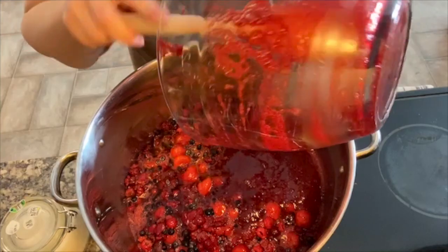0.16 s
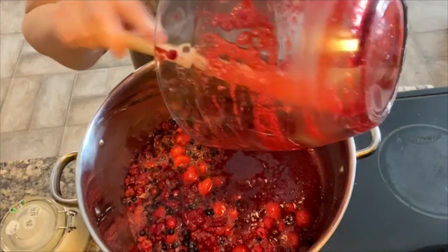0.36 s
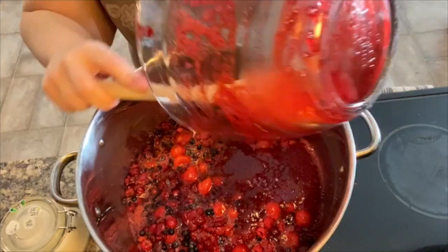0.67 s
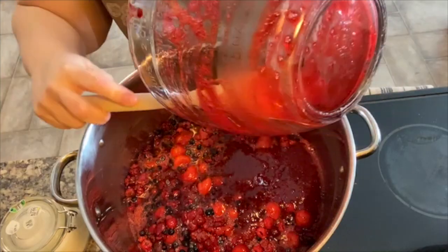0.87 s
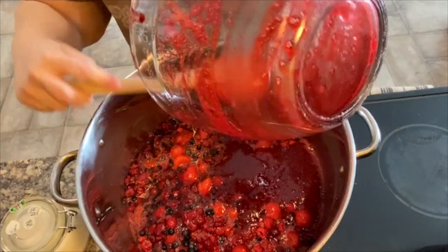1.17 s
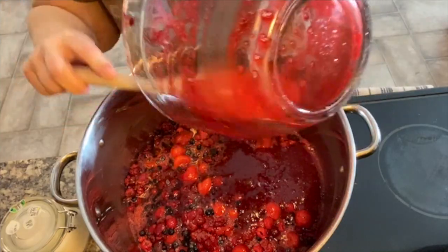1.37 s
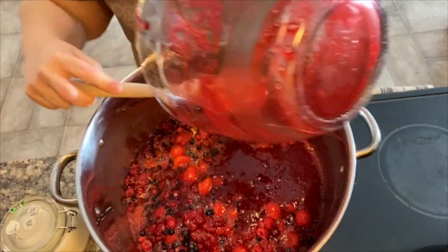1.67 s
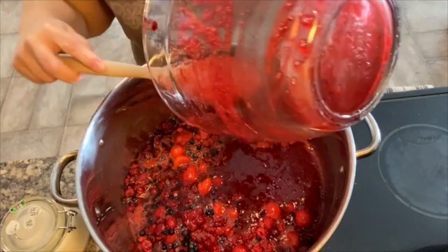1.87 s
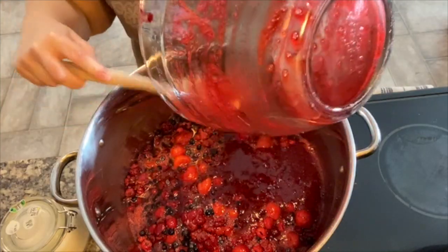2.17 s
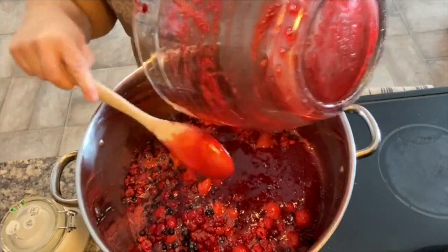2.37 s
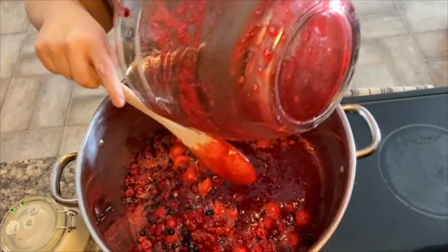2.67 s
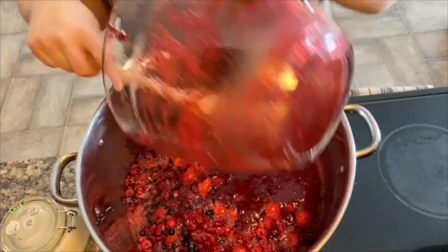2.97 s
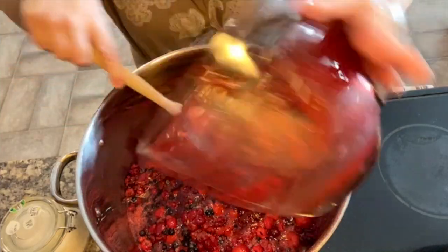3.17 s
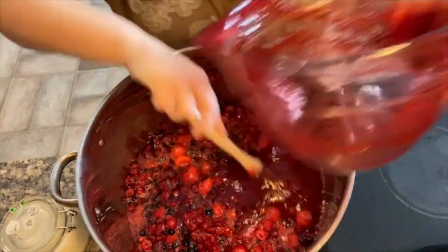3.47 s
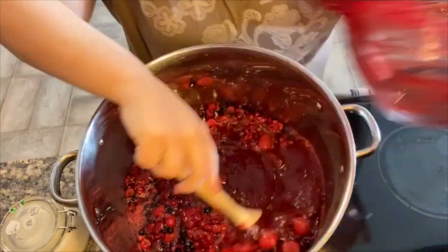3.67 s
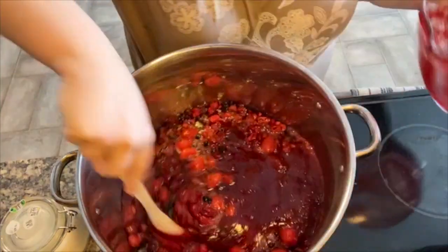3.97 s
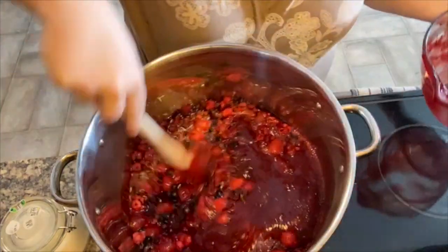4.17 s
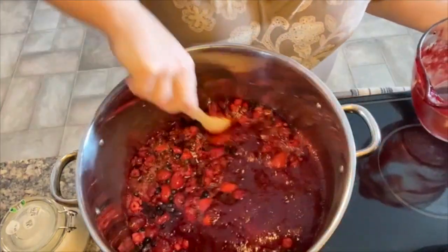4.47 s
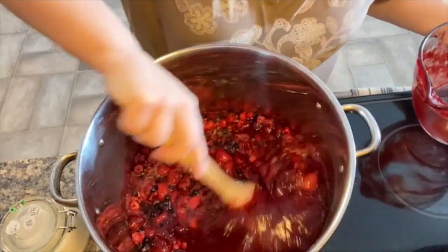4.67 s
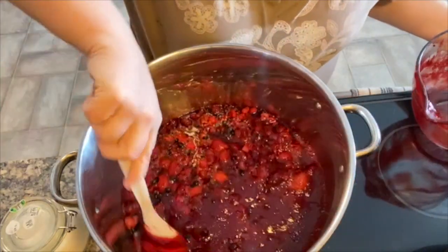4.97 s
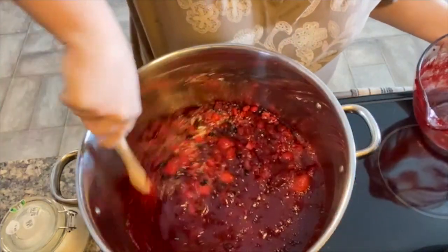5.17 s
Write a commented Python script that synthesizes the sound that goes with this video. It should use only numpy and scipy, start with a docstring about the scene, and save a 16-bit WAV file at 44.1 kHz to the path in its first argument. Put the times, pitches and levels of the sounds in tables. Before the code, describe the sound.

A stereo microphone sits close to a steel pot in a home kitchen, with a quiet, low appliance hum and room noise throughout. For the first three seconds a wooden spoon scrapes fruit pulp from a glass bowl, with short drags, soft squelches and wet clicks. It knocks and bounces on the glass at about 0.2 and 0.4 seconds, also bumping the pot, then hardest at 1.4 seconds, leaving a brief ringing murmur. A double knock with bright, juicy snaps comes at 2 seconds, and lighter taps follow near 2.5 and 2.7. From 3.2 to 4.3 seconds the spoon slides into the pot and round it with two soft swishes, the first sinking in pitch. Stirring continues to the end, the fruit squelching, clicking and faintly crackling, while the spoon bumps the full pot with dull thuds at about 3.4, 4.5, 4.9 and 5.2 seconds.

```python
"""A home kitchen, stereo microphone close to a steel pot; fruit pulp is scraped into it from a glass bowl.
From the start an appliance hums and the room's noise resonates in the open pot. For the first three
seconds a wooden spoon drags, knocks and bounces on the bowl and twice bumps the pot; the bowl murmurs on
after two of the knocks, and wet pulp clicks and squelches. Next the spoon swishes into the pot and round
it. To the end it stirs the faintly crackling fruit and bumps the full pot with dull thuds."""
import sys
import numpy as np
from scipy import signal
from scipy.fft import rfft, irfft, next_fast_len
from scipy.io import wavfile

SR = 44100
rng = np.random.default_rng(int(sys.argv[2]) if len(sys.argv) > 2 else 0)


def bounce(signal):
    """Save signal as a 16-bit WAV file at the path given by the first command-line argument."""
    frames = np.transpose(np.atleast_2d(signal))
    limited = np.clip(frames, -1, 1)
    pcm = np.round(limited * 32767).astype(np.int16)
    wavfile.write(sys.argv[1], SR, pcm)


N = 235048
TIME = np.arange(N) / SR
BLOW_TIME = TIME[:SR // 2]

# how alike left and right are at the microphone: frequency_hz, correlation
STEREO_LIKENESS = [(30, 0.75), (150, 0.99), (300, 0.457), (600, 0.17), (1500, 0.319), (5000, 0.13),
                   (9000, 0.97), (14000, 0.6)]
# the appliance's motor: pitch_hz, level_db
HUM_PARTIALS = [(60.5, -72.5), (118.7, -51.5)]
# room tone: frequency_hz, density_db
ROOM_SPECTRUM = [(20, -21.5), (30, -17), (42, -7.5), (62, -0.5), (90, 2.5), (160, -7), (260, -8),
                 (370, -17), (800, -19.5), (1500, -23.5), (2600, -26.5), (4000, -38.5), (6500, -44.5),
                 (13500, -45.5)]
# resonances of the air in the open pot: pitch_hz, width_hz, level_db
POT_AIR_MODES = [(532, 18, -63.5), (624.5, 4, -60.5), (1292, 24, -73)]
# close reflections off pot and hob: frequency_hz, density_db
NEAR_SPECTRUM = [(60, -13), (300, 1), (1500, -4), (5000, -5), (14000, -12)]
# the kitchen's reverberation: frequency_hz, t60_s
ROOM_DECAY = [(100, 0.5), (500, .4), (1500, 0.3), (4000, 0.47), (8000, 0.2), (15000, 0.48)]

# the spoon drags on the bowl, and the bowl murmurs on after two knocks: start_s, length_s, level_db
DRAGS_AND_MURMURS = [(-.02, 0.018, -49), (.565, 0.039, -52.5), (.69, .18, -64.5), (.98, 0.016, -60),
                     (1.42, 0.2, -55.5), (1.63, 0.057, -60.5)]
# the narrow murmur of spoon and bowl: frequency_hz, density_db
MURMUR_SPECTRUM = [(500, -24), (1000, -27), (1250, 5.5), (1340, 5), (1480, -3), (1900, -16), (2700, -20.5),
                   (4500, -32)]
# the spoon slides into the pot, then round it: start_s, peak_s, end_s, level_db
SLIDE_STROKES = [(3.249, 3.585, 3.762, -53.5), (3.74, 4.047, 4.3, -57.5)]
# resonances of the sliding spoon: pitch_ratio, level_db
SLIDE_RESONANCES = [(1.0, 6.5), (1.179, -10), (1.37, 1), (1.68, -6)]
# friction hiss of the slide: frequency_hz, density_db
SLIDE_SPECTRUM = [(900, -0.5), (1500, -8), (2100, 3.5), (3200, -11), (4200, -10), (5200, -14), (6300, -14),
                  (9000, -20.5), (14000, -25)]

# the spoon pushes pulp out of the bowl, then round the pot: start_s, length_s, level_db
PULP_STROKES = [(-.02, 0.047, -63.5), (.14, 0.16, -58.5), (.5, 0.11, -71), (.74, 0.1, -72.5),
                (.98, 0.075, -72), (2.19, .11, -68.5), (2.915, 0.072, -68), (3.26, 0.11, -65.5),
                (3.33, 0.275, -71), (3.86, 0.39, -64.5), (4.41, 0.12, -62), (4.72, 0.2, -66),
                (4.91, 0.47, -62)]
# squelching pulp: frequency_hz, density_db
SQUELCH_SPECTRUM = [(700, -2.5), (1500, 5.5), (2800, 1.5), (4000, -1), (6000, -4.5), (8500, -2.5),
                    (12500, -6.5), (15000, -7.5)]
# the loudest wet clicks: start_s, level_db, tilt_db_per_octave
WET_CLICKS = [(0.052, -42, 6), (0.1460, -36.5, -1), (0.647, -44, -2.5), (1.078, -36, -7), (1.236, -49, 6.5),
              (1.740, -45, -4), (1.919, -51.5, 7), (1.962, -33, 16), (1.981, -25, 20), (2.029, -24.5, 10),
              (2.607, -48, 3), (3.115, -50, 14), (3.295, -40, 2), (3.349, -39, 15), (3.674, -28.5, -5),
              (3.728, -34.5, 0), (4.597, -35.5, 19), (4.731, -38, 2.5), (4.955, -31, -0.5),
              (5.094, -31, 19), (5.1819, -32, 7)]
# one film of juice snapping: frequency_hz, density_db
SNAP_SPECTRUM = [(300, -9.5), (1200, -4), (4000, -1), (8500, 3), (14000, -11.5)]

# bumps on the full pot: start_s, ring_db, thump_db, tilt_db_per_octave
POT_BUMPS = [(0.2170, -42, -33, 0), (0.4389, -50, -32.5, -3), (3.398, -36, -25.5, -1.5),
             (3.6757, -67, -40, 7), (4.456, -31, -26, -0.5), (4.489, -60, -36.5, -3.5),
             (4.7300, -78, -43, 6.5), (4.7721, -61.5, -49.5, 3.5), (4.8995, -41.5, -36.5, -0.5),
             (5.217, -38, -28, 0)]
# the steel pot damped by fruit, before tuning: pitch_hz, level_db, t60_s
POT_MODES = [(57.3, -8.5, 0.65), (149, 4, 0.093), (188.8, 0, 0.2), (260.2, 1, 0.15), (318.6, -10.5, 0.098),
             (383.6, -10.5, 0.047), (427, -10.5, 0.32), (578, 3, 0.056), (656, -20.5, .12),
             (785.4, -0.5, 0.13), (1060, -10, 0.036), (1470, -11, 0.065)]
# the cushioned contact with the pot: frequency_hz, density_db
THUMP_SPECTRUM = [(50, -7.5), (150, -4), (400, 3.5), (750, -2), (1100, -8), (1600, -15.5), (3000, -23.5),
                  (6000, -48), (14000, -41.5)]

# spoon on bowl: start_s, spoon_db, glass_db, hollow_db, crack_db, crack_tilt_db_per_octave,
# rebound_gap_s, rebound_db
BOWL_KNOCKS = [(0.2160, -14.5, -37, -22.5, -13, 3.5, .0037, -10),
               (0.4372, -24, -47, -21.5, -17.5, -3, .0080, 5.5),
               (1.3585, -6.5, -23.5, -22, -13, -1.5, 0.019, -8.5),
               (1.6335, -45.5, -58.5, -63, -28.5, -5.5, .004, -22),
               (2.0060, -19.5, -30.5, -22.5, -21, -4.5, 0.0029, -31),
               (2.0266, -34, -23.5, -19, -37.5, -3.5, .0180, 13.5),
               (2.4635, -31, -34, -34, -29.5, -4.5, 0.0037, -8),
               (2.7040, -38.5, -55, -29, -27.5, -3.5, 0.0036, -13)]
# the damped wooden spoon, before tuning: pitch_hz, level_db, t60_s
SPOON_MODES = [(802.6, -37, 0.099), (1174, -14, 0.04), (1262, -10, 0.045), (1374.5, 0.5, 0.059),
               (1423, 6.5, 0.018), (1765, -8.5, 0.018), (1864, -13.5, 0.025), (2050, -12.5, 0.031),
               (2284, -18.5, 0.083), (2550, -24, 0.05), (2745, -17.5, .045), (3320, -28, .04),
               (5660, -35, 0.017), (6635, -36.5, 0.025)]
# the bowl's glass wall, before tuning: pitch_hz, level_db, t60_s
GLASS_MODES = [(1271, -13, .25), (1377, -17, .2), (1462, 0, .3), (1790, -17, .16), (1958, -18, .16),
               (2597, -19, .22), (2723, -23, .18), (3620, -27, .14), (4060, -26, .14)]
# the changing grip tunes the glass: time_s, pitch_ratio
GRIP_TUNING = [(.2, 1.02), (1.36, 1.0), (2.0, 1.03)]
# the hollow of air under the spoon, before tuning: pitch_hz, level_db, t60_s
HOLLOW_MODES = [(480, -13, .06), (596, -3, .07), (624, -1, .14)]
# the hard contact with the bowl: frequency_hz, density_db
CRACK_SPECTRUM = [(60, -20), (200, -9), (350, -23), (560, 4), (720, 0.5), (1050, 0), (1600, -11),
                  (2500, -2), (4000, -13), (8000, -19), (13000, -34.5)]


def from_db(db):
    """Decibels to gain."""
    return 10 ** (np.asarray(db) / 20)


def unit_rms(x):
    """Scale to unit power."""
    return x / np.sqrt(np.mean(x ** 2) + 1e-20)


def at_hz(points, hz):
    """Read a table along log frequency."""
    table_hz, values = np.transpose(points)
    return np.interp(np.log(hz + 1), np.log(table_hz), values)


def drift(rate_hz):
    """Smooth random wander of spread 1."""
    hz = np.fft.rfftfreq(N, 1 / SR)
    return unit_rms(irfft(rfft(rng.standard_normal(N)) / (1 + (hz / rate_hz) ** 4), N))


def coloured(white, spectrum, tilt=0):
    """Two unrelated signals become a stereo pair of rms 1, its spectrum tilted in dB per octave."""
    size = next_fast_len(white.shape[1])
    hz = np.fft.rfftfreq(size, 1 / SR)
    alike = at_hz(STEREO_LIKENESS, hz)
    octaves = np.log2(np.maximum(hz, 100) / 1000)
    mid, side = rfft(white, size) * from_db(at_hz(spectrum, hz) + tilt * octaves)
    pair = np.sqrt(1 + alike) * mid + np.sqrt(1 - alike) * side * [[1], [-1]]
    return unit_rms(irfft(pair, size)[:, :white.shape[1]])


def noise(spectrum):
    """Steady stereo noise."""
    return coloured(rng.standard_normal((2, N)), spectrum)


def panned(x, left_db):
    """Place a sound left of the microphone's centre, or right if negative."""
    return x * from_db([[left_db / 2], [-left_db / 2]])


def add(out, start_s, sound):
    """Mix a short sound in at a time."""
    start = max(round(start_s * SR), 0)
    out[:, start:start + sound.shape[1]] += sound[:, :N - start]


def fade(t60_s, rise_s):
    """Force builds up over the contact, then the motion dies away."""
    return (1 - np.exp(-BLOW_TIME / rise_s)) * np.exp(-np.log(1000) * BLOW_TIME / t60_s)


def ring(modes, tuning, tilt, rise_s, left_lag_s):
    """Struck modes, alternating in sign; the tilt in dB per octave pivots on the third mode."""
    out = np.zeros((2, len(BLOW_TIME)))
    stereo_time = BLOW_TIME - [[left_lag_s], [0]]
    for k, (hz, db, t60_s) in enumerate(modes):
        gain = (-1) ** k * from_db(db + tilt * np.log2(hz / modes[2][0]))
        out += gain * fade(t60_s, rise_s) * np.sin(2 * np.pi * hz * tuning * stereo_time)
    return out


def burst(spectrum, tilt, t60_s, rise_s):
    """Crowded, quickly dying modes, heard as a puff of noise."""
    return coloured(rng.standard_normal((2, len(BLOW_TIME))), spectrum, tilt) * fade(t60_s, rise_s)


def envelope(rows, attack_share=0.17, release_s=0.03):
    """Gain over time: each row builds over a share of its length, holds and dies away."""
    gain = 0
    for start_s, length_s, db in rows:
        attack = np.clip((TIME - start_s) / (attack_share * length_s), 0, 1)
        release = np.exp(-np.maximum(TIME - start_s - length_s, 0) / release_s)
        gain = np.maximum(gain, from_db(db) * attack * release)
    return gain


def room_tone(level_db=-56):
    """The kitchen's steady noise, mostly bass."""
    return from_db(level_db) * noise(ROOM_SPECTRUM)


def appliance_hum(wander_hz=0.5):
    """A motor hums in the background, its two partials wavering in pitch."""
    hum = 0
    for hz, db in HUM_PARTIALS:
        phase = 2 * np.pi * np.cumsum(hz + wander_hz * drift(4)) / SR
        hum += from_db(db) * np.sqrt(2) * np.sin(phase)
    return hum


def pot_air():
    """The air in the open pot sings along with the room's noise."""
    out = 0
    for hz, width_hz, db in POT_AIR_MODES:
        b, a = signal.iirpeak(hz, hz / width_hz, fs=SR)
        out += from_db(db) * unit_rms(signal.lfilter(b, a, noise(ROOM_SPECTRUM)))
    return out


def kitchen_reflections(direct, near_db=-5.5, far_db=-11.5, build_up_s=0.0074):
    """Pot and hob answer from close by; farther off, the room's tail dies band by band."""
    edges_hz = np.geomspace(60, 16000, 9)
    white = rng.standard_normal((2, 2, len(BLOW_TIME)))
    tail = 0
    for k, (low, high) in enumerate(zip(edges_hz, edges_hz[1:])):
        band = signal.sosfilt(signal.butter(2, [low, high], "band", fs=SR, output="sos"), white[k % 2])
        tail += band * fade(at_hz(ROOM_DECAY, np.sqrt(low * high)), build_up_s)
    near = burst(NEAR_SPECTRUM, tilt=0, t60_s=0.05, rise_s=0.00076)
    response = from_db(near_db) * unit_rms(near) + from_db(far_db) * unit_rms(tail)
    return signal.fftconvolve(direct, response / np.sqrt(len(BLOW_TIME)), axes=1)[:, :N]


def drags_and_murmurs(unevenness_db=4.0):
    """The spoon drags on the bowl with uneven friction, and the bowl murmurs on after two knocks."""
    return noise(MURMUR_SPECTRUM) * envelope(DRAGS_AND_MURMURS) * from_db(unevenness_db * drift(25))


def spoon_slides(start_hz=2600, end_hz=1576, sink_s=0.28, width_hz=100, side_db=2.5, tone_share=0.4):
    """Friction hiss, with resonances that sink as the spoon goes deeper and the contact moves along it."""
    elapsed_s = np.maximum(TIME - SLIDE_STROKES[0][0], 0)
    lowest_hz = end_hz + (start_hz - end_hz) * np.exp(-elapsed_s / sink_s)
    phase = 2 * np.pi * np.cumsum(lowest_hz) / SR
    tones = 0
    for ratio, db in SLIDE_RESONANCES:
        mid = drift(width_hz) * np.cos(ratio * phase) + drift(width_hz) * np.sin(ratio * phase)
        side = from_db(side_db) * drift(width_hz) * np.cos(ratio * phase)
        tones += from_db(db) * (mid + side * [[1], [-1]])
    swish = np.sqrt(tone_share) * unit_rms(tones) + np.sqrt(1 - tone_share) * noise(SLIDE_SPECTRUM)
    swell = 0
    for *times_s, db in SLIDE_STROKES:
        swell += from_db(db) * np.sin(np.interp(TIME, times_s, [0, np.pi / 2, np.pi]))
    return swish * swell


def pulp_squelch(pops_per_s=1400, clump_db=4.0, spread_db=2.0, gain_db=0.5, settle_from_s=3.21):
    """Tiny pops come in clumps as pulp is pushed about; once stirred, it keeps crackling faintly."""
    pops = rng.random((2, N)) < pops_per_s * from_db(clump_db * drift(22)) / SR
    sizes = from_db(spread_db * np.minimum(rng.exponential(1, (2, N)), 5))
    signs = rng.choice([-1, 1], (2, N))
    crackle = from_db(gain_db) * coloured(pops * sizes * signs, SQUELCH_SPECTRUM)
    settling = from_db(-71) * (TIME > settle_from_s)
    return crackle * np.hypot(envelope(PULP_STROKES), settling)


def wet_clicks():
    """Films of juice snap with a short, broad hiss; the smaller the film, the brighter."""
    out = np.zeros((2, N))
    for start_s, db, tilt in WET_CLICKS:
        add(out, start_s, from_db(db) * burst(SNAP_SPECTRUM, tilt, t60_s=0.0066, rise_s=0.00084))
    return out


def pot_thuds():
    """Just right of centre, the spoon, cushioned by fruit, wakes mostly the pot's low modes."""
    out = np.zeros((2, N))
    for start_s, ring_db, thump_db, tilt in POT_BUMPS:
        body = ring(POT_MODES, tuning=0.98, tilt=tilt, rise_s=0.00032, left_lag_s=0.00017)
        thump = burst(THUMP_SPECTRUM, tilt, t60_s=0.048, rise_s=0.0005)
        add(out, start_s, from_db(ring_db) * body + from_db(thump_db) * thump)
    return panned(out, left_db=-0.9)


def contact_crack(level_db, tilt):
    """Wood meets glass in a short, dry burst."""
    return from_db(level_db) * burst(CRACK_SPECTRUM, tilt, t60_s=0.031, rise_s=0.0013)


def bowl_knocks(normal_blow_db=-19, tilt_per_db=0.34, gap_share=0.41, bounce_loss_db=14):
    """Just left of centre, each knock cracks and rings spoon, glass and hollow; two rebounds follow."""
    out = np.zeros((2, N))
    hollow = ring(HOLLOW_MODES, tuning=0.96, tilt=0, rise_s=0.00075, left_lag_s=0.0001)
    hollow = panned(hollow, left_db=1.5)
    for start_s, spoon_db, glass_db, hollow_db, crack_db, crack_tilt, gap_s, rebound_db in BOWL_KNOCKS:
        grip_tuning = np.interp(start_s, *np.transpose(GRIP_TUNING))
        tilt = tilt_per_db * (spoon_db - normal_blow_db)   # harder blows ring brighter
        spoon = ring(SPOON_MODES, tuning=0.98, tilt=tilt, rise_s=0.0008, left_lag_s=0.00004)
        spoon *= from_db(spoon_db)
        glass = ring(GLASS_MODES, grip_tuning, tilt, rise_s=0.00075, left_lag_s=0.00024)
        bowl = from_db(glass_db) * glass + from_db(hollow_db) * hollow
        add(out, start_s, spoon + bowl + contact_crack(crack_db, crack_tilt))
        for k in range(2):   # the second rebound comes sooner and weaker than the first
            start_s += gap_s * gap_share ** k
            crack = contact_crack(crack_db - 12, crack_tilt + 2.5)   # less crack to the ring, but brighter
            add(out, start_s, from_db(rebound_db - bounce_loss_db * k) * (spoon + crack))
    return panned(out, left_db=1.05)


def scene():
    """The work at the pot up close, the kitchen's reflections behind it, the background a little left."""
    direct = bowl_knocks() + pot_thuds() + wet_clicks() + pulp_squelch()
    direct += drags_and_murmurs() + spoon_slides()
    reflections = kitchen_reflections(direct)
    background = panned(appliance_hum() + pot_air() + room_tone(), left_db=2.0)
    return direct + reflections + background


def record(dry, port_hz=10400, port_width_hz=2200, low_cut_hz=40, high_cut_hz=14300):
    """The microphone's port dulls one treble band; deep bass is shed and the top is cut."""
    b, a = signal.iirnotch(port_hz, port_hz / port_width_hz, fs=SR)
    low_cut = signal.butter(3, low_cut_hz, "high", fs=SR, output="sos")
    high_cut = signal.ellip(10, 0.2, 80, high_cut_hz, fs=SR, output="sos")
    notched = signal.lfilter(b, a, dry)
    return signal.sosfilt(high_cut, signal.sosfilt(low_cut, notched))


dry = scene()
out = record(dry)
bounce(out)
```